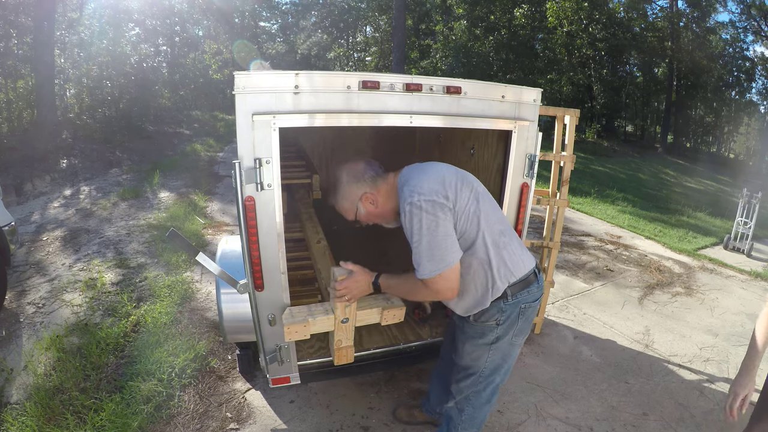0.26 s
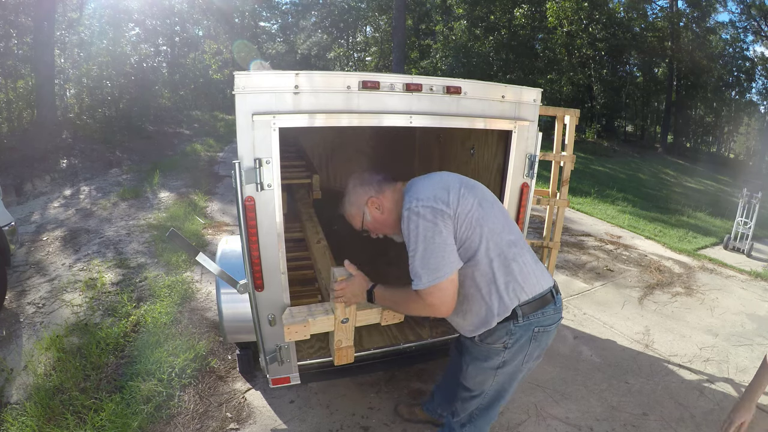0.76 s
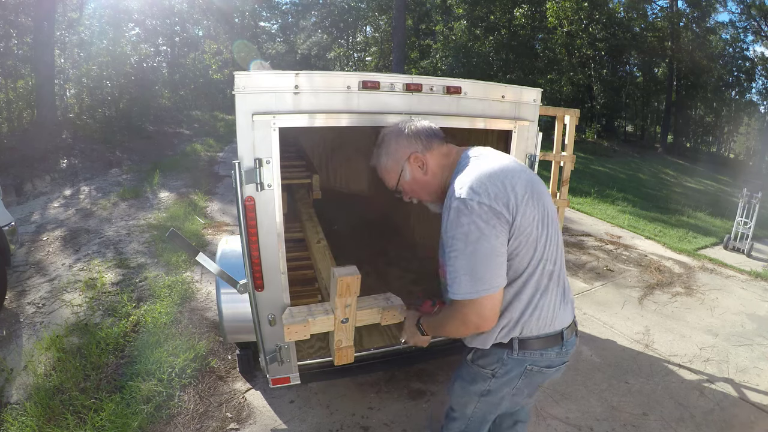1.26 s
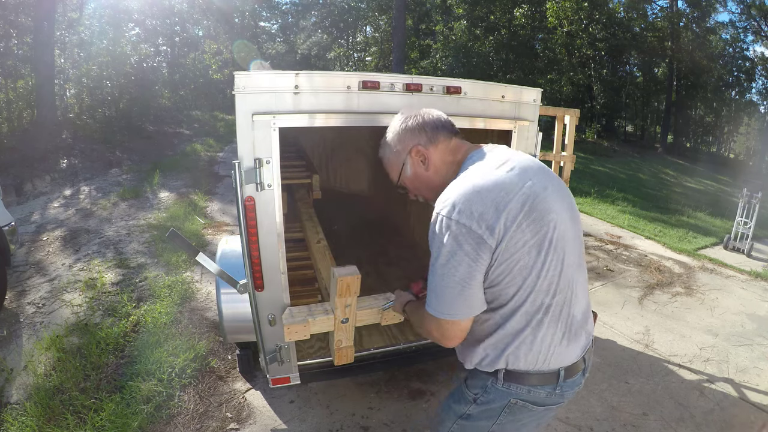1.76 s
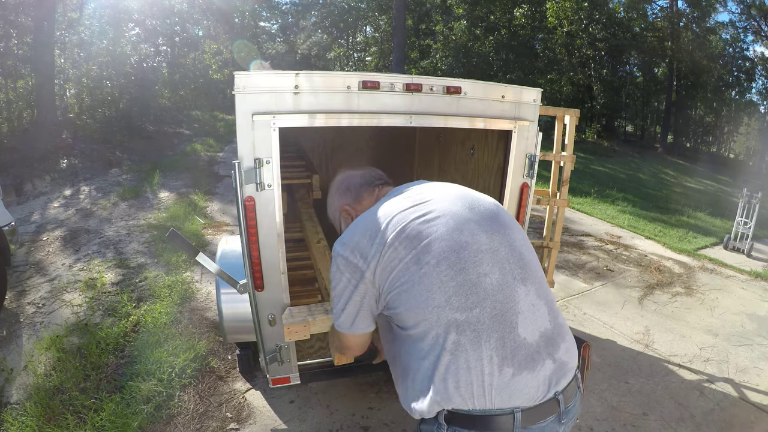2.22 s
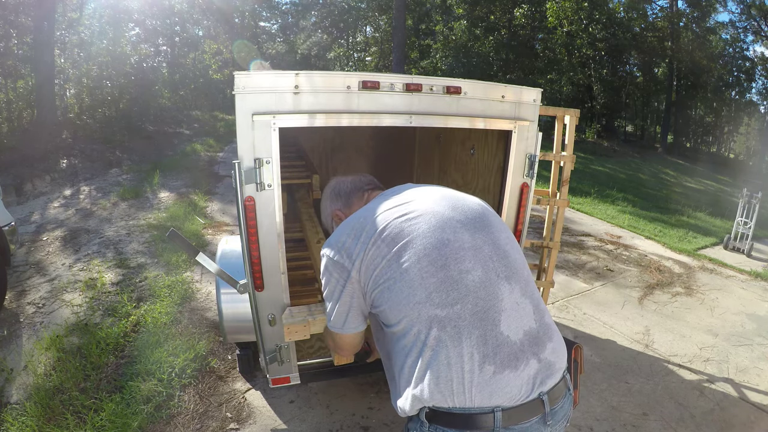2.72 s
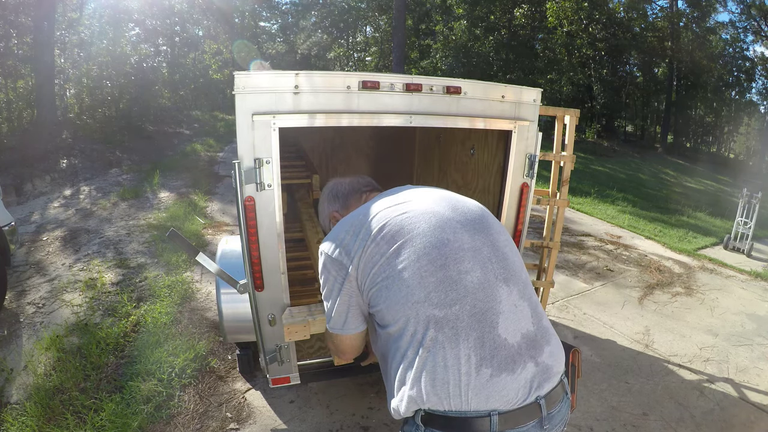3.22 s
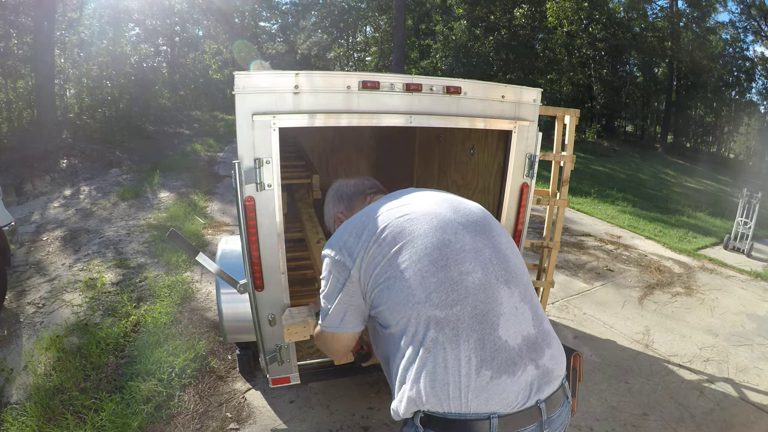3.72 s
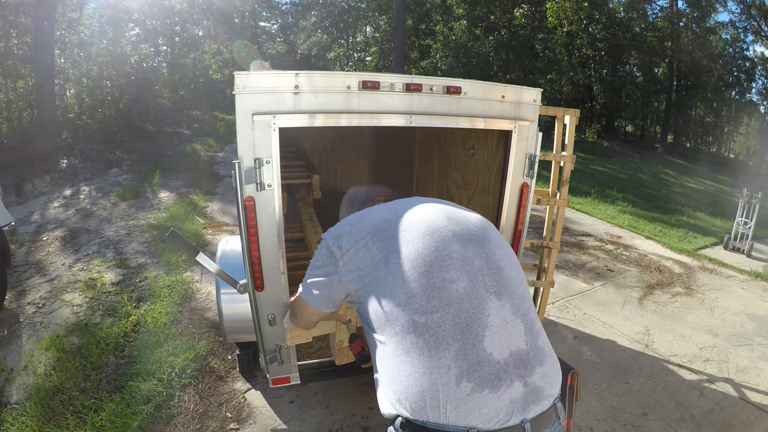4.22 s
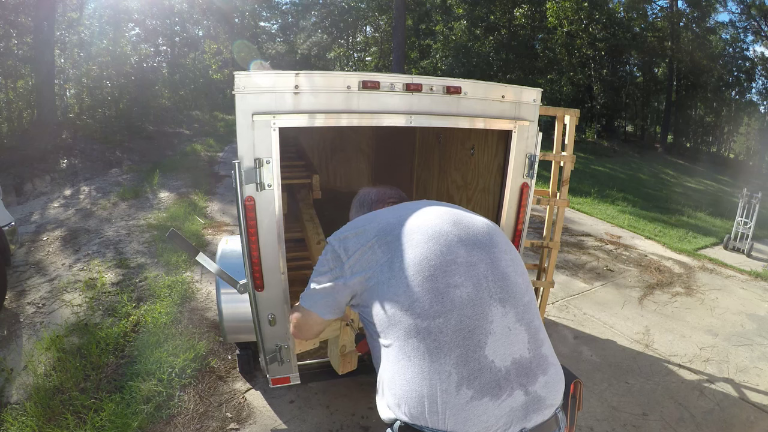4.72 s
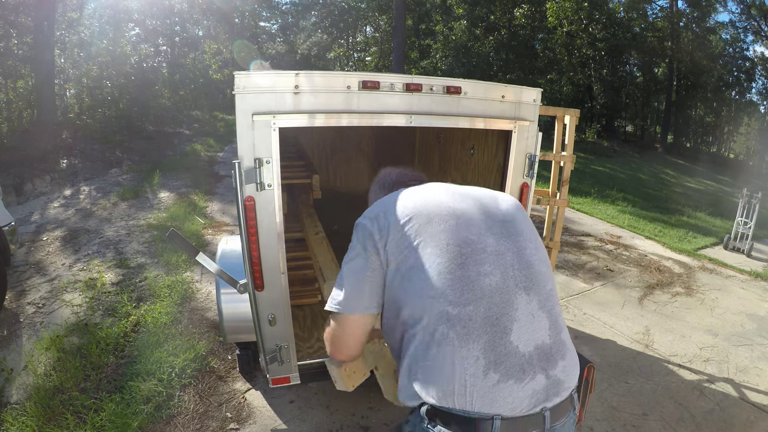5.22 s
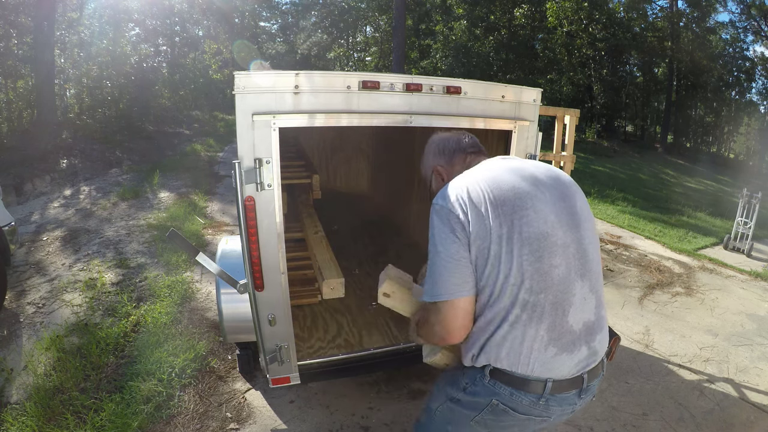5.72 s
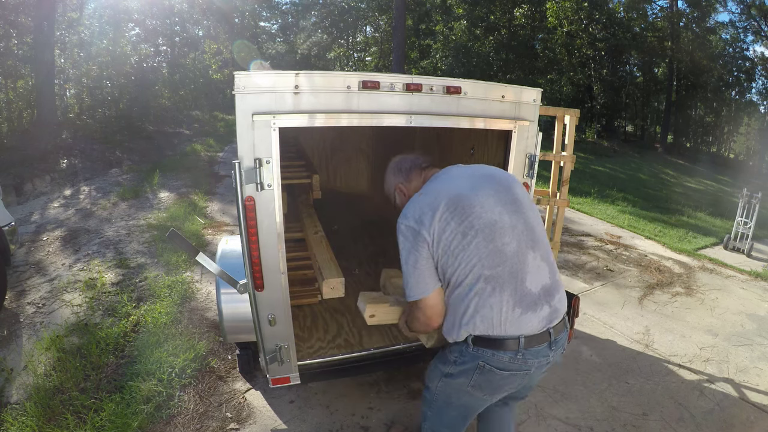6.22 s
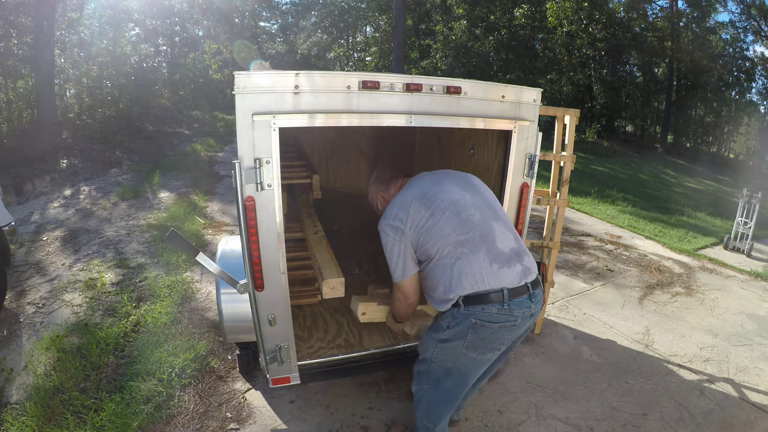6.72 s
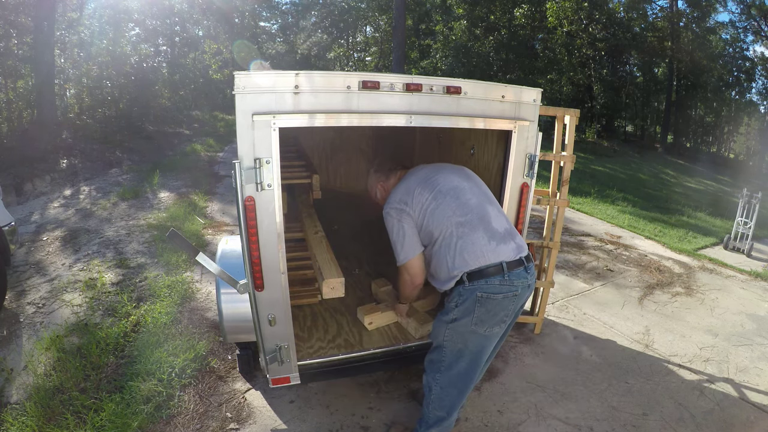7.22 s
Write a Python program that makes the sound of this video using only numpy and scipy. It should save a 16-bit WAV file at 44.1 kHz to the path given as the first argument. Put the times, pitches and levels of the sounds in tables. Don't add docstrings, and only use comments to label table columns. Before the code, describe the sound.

Close outdoor sound at an open box trailer: boards bump the plywood floor and scrape, then a steel clamp is tapped, clinking and ringing. Its screw is wound loose with a thin, broken squeak and small handle taps. A heavy, hollow wooden crash follows, then quieter rubbing, and finally boards land with deep, booming thuds. Insects buzz and light wind rumbles at a small microphone.

```python
import sys
import numpy as np
from scipy import signal
from scipy.fft import rfft, irfft
from scipy.io import wavfile
from scipy.ndimage import uniform_filter1d

SR = 44100
rng = np.random.default_rng(int(sys.argv[2]) if len(sys.argv) > 2 else 0)


def volts(x):
    e = np.asarray(x, float) / 20
    return 10 ** e


def digitize_waveform(pressure):
    field = np.atleast_2d(pressure).T
    bounded = np.clip(field, -1, 1)
    quanta = np.round(bounded * 32767).astype(np.int16)
    wavfile.write(sys.argv[1], SR, quanta)


N = 329427

# (t/s, slip rate f/Hz, squeak level/dB, hand pressure level/dB)
SCREW_TURNS = [(3.435, 480, -43, -47), (3.465, 514, -36.5, -44.5), (3.57, 484, -37.5, -42.5),
               (3.68, 456.5, -38.5, -43.5), (3.72, 518, -44.5, -43.5), (3.84, 497, -40, -44),
               (3.9, 445, -39.5, -46.5), (3.96, 495, -37.5, -46.5), (4.12, 525, -39.5, -46.5),
               (4.17, 473.5, -39, -45.5), (4.25, 518, -38, -46.5), (4.29, 478, -41.5, -47.5),
               (4.36, 520, -44, -48), (4.55, 530, -46, -46.5), (4.59, 472, -44, -45.5),
               (4.66, 521, -43.5, -44.5), (4.86, 507, -42, -43.5), (4.95, 470, -56, -44)]


def evened(x):
    return x / np.sqrt(np.mean(x ** 2) + 1e-20)


def peaked(x, db):
    return volts(db) * x / abs(x).max()


def read(points, hz):
    f, value = np.transpose(points)
    return np.interp(np.log(hz + 1), np.log(f + 1), value)


def curves(rows):
    s, *columns = np.transpose(rows)
    return [np.interp(np.arange(N) / SR, s, c) for c in columns]


def add(mix, s, sound):
    part = mix[round(s * SR):][:len(sound)]
    part += sound[:len(part)]


def colour(x, spectrum):
    gain = volts(read(spectrum, np.fft.rfftfreq(len(x), 1 / SR)))
    return evened(irfft(rfft(x) * gain, len(x)))


def dulled(x, hz):
    return signal.sosfilt(signal.butter(3, hz, fs=SR, output="sos"), x)


def drift(hz):
    keep = 1 / (1 + (np.fft.rfftfreq(N, 1 / SR) / hz) ** 4)
    return evened(irfft(rfft(rng.standard_normal(N)) * keep, N))


def gritty(spread_db, share):
    grains = volts(spread_db * np.minimum(rng.exponential(1, N), 4)) * (rng.random(N) < share)
    return rng.standard_normal(N) * (1 + grains)


def resonate(x, hz, width):
    turn = np.exp(2j * np.pi * np.cumsum(hz * np.ones(len(x))) / SR)
    r = np.exp(-np.pi * width / SR)
    return 2 * (turn * signal.lfilter([1 - r], [1, -r], x / turn)).real


def ring(modes, t, stretch=1):
    wave = sum(volts(db - 60 * t / (t60 * stretch)) * np.sin(2 * np.pi * hz * t) for hz, db, t60 in modes)
    return wave / abs(wave).max()


def tail(t, stretch, spectrum):
    # (f/Hz, t60/s)
    trailer_decay = [(100, 0.41), (300, 0.75), (1000, 0.54), (3000, 0.48), (6000, 0.5), (10000, 0.16)]
    hz, at, z = signal.stft(rng.standard_normal(len(t)), SR, nperseg=256)
    fade_db = 60 * at / (stretch * read(trailer_decay, hz)[:, None])
    z = z * volts(read(spectrum, hz)[:, None] - fade_db)
    wave = signal.istft(z, SR, nperseg=256)[1][:len(t)]
    return wave / np.linalg.norm(wave)


SWELL_DB = 20


def swell(s, rise, fall):
    late = np.arange(N) / SR - s
    return volts(-SWELL_DB * np.maximum(-late / max(rise, .002), late / max(fall, .002)))


def stroke(rows):
    let_go_s = .08
    t = np.arange(N) / SR
    return np.clip((t - rows[0][0]) / 0.0022, 0, 1) * volts(-SWELL_DB * np.maximum(t - rows[-1][0], 0) / let_go_s)


def outdoors():
    # (f/Hz, level/dB per Hz)
    rustle = [(35, -22), (60, -11), (102, -12.5), (222, -8), (785, -19.5), (3660, -29), (4500, -31.5),
              (5800, -18), (7000, -18), (8000, -20.5), (8500, -31), (9800, -30), (12900, -42.5),
              (14500, -54)]
    # (t/s, level/dB)
    gusts = [(0.0, -34), (0.33, -29.5), (0.66, -37), (1.37, -39), (2.23, -53), (2.47, -45), (2.79, -61),
             (3.04, -63), (3.2, -62), (3.95, -36.5), (4.56, -36.5), (4.99, -34), (5.24, -76), (5.45, -25.5),
             (6.62, -39.5), (7.05, -58), (7.28, -59), (7.47, -40)]
    # (f/Hz, level/dB per Hz)
    rumble = [(8.8, -34), (15, 11.5), (27, -4), (43, 0.5), (91, -11.5), (151, -23.5), (200, -38.5),
              (260, -32.5), (440, -120)]
    air = volts(-55 + 1.5 * drift(1.1)) * colour(rng.standard_normal(N), rustle)
    return air + volts(curves(gusts)[0] + 1.7 * drift(24)) * colour(rng.standard_normal(N), rumble)


def insects():
    # (f/Hz, width/Hz, level/dB)
    buzz_bands = [(6800, 200, -10), (7250, 120, -3), (7450, 120, -2), (7620, 120, 0), (7790, 100, -1)]
    level_db, throb_hz = -58, 55.5
    throb = 1 + 0.44 * np.cos(2 * np.pi * np.cumsum(throb_hz * (1 + 0.013 * drift(2.6))) / SR)
    common, out = rng.standard_normal(N), []
    for side_db in (1.5, -1.5):
        noise = 0.85 * common + rng.standard_normal(N)
        buzz = np.zeros(N)
        for hz, width, db in buzz_bands:
            buzz += volts(db) * resonate(resonate(noise, hz, 0.6 * width), hz, 0.6 * width)
        out.append(volts(level_db + side_db + 0.31 * drift(4.2)) * throb * evened(buzz))
    return np.array(out)


def rubbing():
    # (loudest t/s, rise/s, fall/s, hiss level/dB, body against hiss level/dB)
    strokes = [(0.0, .01, 0.19, -52.5, -0.5), (0.142, 0.053, 0.049, -54, -9), (.3, 0.15, 0.13, -54, -15),
               (.56, 0.06, 0.43, -46.5, -8), (0.949, 0.12, 0.033, -35.5, -5.5),
               (1.151, 0.16, 0.053, -66, 16), (1.157, .004, 0.12, -37, -2), (1.202, 0.044, 0.063, -28, -1),
               (1.42, 0.23, 0.21, -54, -1.5), (1.694, 0.016, 0.066, -37, -20),
               (1.851, 0.0056, 0.13, -54, -0.5), (2.275, 0.12, 0.084, -42.5, -4),
               (2.561, 0.32, 0.19, -47, 0.5), (2.914, .003, 0.1, -48.5, -11), (2.05, 0.3, 0.071, -57.5, -8),
               (2.98, 0.003, 0.044, -41.5, -4), (3.005, 0.0073, 0.1, -34.5, 0.5),
               (3.205, .003, 0.05, -50.5, 4), (3.047, 0.003, 0.12, -36.5, -11), (3.154, 0.21, 0.12, -49, 9),
               (3.375, 0.011, 0.16, -32, -12), (3.11, .004, 0.062, -33, -20), (5.18, 0.0027, .16, -37, -9),
               (5.702, 0.0037, 0.043, -47, -8), (5.789, 0.13, 0.038, -49.5, -3),
               (5.983, 0.0041, 0.036, -60, 3), (6.235, 0.046, 0.15, -47, -8.5),
               (6.349, 0.0047, 0.031, -41.5, -15), (6.1, 0.32, 0.82, -64, 1),
               (6.592, 0.013, 0.1, -34.5, -7), (6.861, 0.028, 0.16, -42, 2), (7.09, 0.0044, 0.04, -48, -21),
               (7.248, 0.19, 0.097, -31.5, -4.5)]
    # (f/Hz, level/dB per Hz)
    hiss_spectrum = [(2060, -30), (3500, -15), (4280, -19), (5210, 1.5), (5630, 6), (6270, 3.5),
                     (8340, -14.5), (9680, -14.5), (11200, -35), (14500, -38)]
    # (f/Hz, level/dB per Hz)
    body_spectrum = [(76, -44), (130, 3), (215, 1), (378, -3.5), (439, -4.5), (868, -9), (1720, -7.5),
                     (4500, -14), (5850, -59), (9900, -120)]
    # (f/Hz, level/dB per Hz)
    grumble_spectrum = [(65, -45), (118, -6), (189, 6), (281, -7.5), (328, -11), (365, -24), (600, -29),
                        (780, -46), (1320, -120)]
    # (loudest t/s, rise/s, fall/s, level/dB)
    swish = (7.1, .02, .08, -57)
    # (heaviest t/s, rise/s, fall/s, grumble level/dB, box hum level/dB)
    weight_shifts = [
        (.3, 1, 1.14, -42, -32.5),
        (2.56, 0.31, 0.33, -42, -52),
        (3.15, 0.12, 2.17, -38, -90),
        (4.4, 0.94, 1.4, -56.5, -37.5),
        (5.37, 0.15, 0.37, -33, -26),
        (6.1, .5, 1.1, -77, -55.5),
        (7.05, 0.15, 0.41, -31, -24.5),
        (7.3, 0.35, 0.37, -34, -22),
    ]
    grain = gritty(3.7, .05) * volts(0.76 * drift(49))
    hiss, body = colour(grain, hiss_spectrum), colour(grain, body_spectrum)
    out = np.zeros(N)
    for s, rise, fall, db, body_db in strokes:
        out += swell(s, rise, fall) * volts(db) * (hiss + volts(body_db) * body)

    out += stroke(SCREW_TURNS) * volts(curves(SCREW_TURNS)[2]) * (hiss + volts(-1) * body)
    cloth = colour(grain, [(7000, -14), (12000, 0), (14000, -8), (14800, -54)])
    out += swell(*swish[:3]) * volts(swish[3]) * cloth

    hum = evened(resonate(resonate(rng.standard_normal(N), 69.0, 16.3), 69.0, 16.3))
    grumble = volts(3.2 * drift(6.3)) * colour(rng.standard_normal(N), grumble_spectrum)
    for s, rise, fall, db, hum_db in weight_shifts:
        out += swell(s, rise, fall) * (volts(db) * grumble + volts(hum_db) * hum)
    return out


def boards():
    # (t/s, plywood level/dB, box boom level/dB, crack level/dB, ring stretch factor)
    landings = [(0.153, -17.5, -18.5, -39, 0.99), (0.186, -16, -13.5, -35, 0.99),
                (0.632, -25.5, -50.5, -37, 0.9), (0.65, -16, -30, -62, 0.96),
                (0.759, -28.5, -53, -44, 0.16), (1.721, -38.5, -42, -76, 0.76),
                (1.821, -41.5, -57, -63, 0.76), (4.378, -38, -58, -34, 1), (4.489, -30.5, -28, -33.5, 0.22),
                (4.836, -26, -32, -35.5, 1), (5.176, -6, -8, -7.5, 0.62), (5.192, -7.5, -10, -11, 0.66),
                (5.214, -3, -5.5, -18.5, 0.7), (5.466, -28, -51, -39, 0.88), (6.113, -38, -46, -60, 0.32),
                (6.347, -42.5, -40, -63, 0.24), (6.59, -36, -60, -54, 0.2), (6.838, -12, -14.5, -56, 0.45),
                (6.859, -17, -12.5, -32, 0.64), (6.92, -20, -11.5, -46, 0.92), (6.978, -19, -29, -44, 0.98),
                (7.145, 5.5, -40, -9, 0.69), (7.169, 2.5, -2.5, -28, 0.51), (7.22, 5, -0.5, -20, 0.66)]
    # (f/Hz, level/dB, t60/s)
    box_modes = [(40, -11, 0.41), (59.5, 8, 0.76), (74, 14, 0.44), (93, -28, 1)]
    # (f/Hz, level/dB, t60/s)
    plywood_modes = [(140.9, 1, 0.59), (168, 5, 0.24), (188.9, -8, 0.36), (232.3, -6.5, 0.62),
                     (316, -10.5, 0.2), (349, -9.5, 0.53), (419, 4.5, 0.098), (484, -12, 0.45),
                     (565, -41, 0.71)]
    # (f/Hz, level/dB per Hz)
    crack_spectrum = [(260, -8), (520, -2), (950, -3), (1600, -2), (2500, -10), (3800, -16), (5790, -13),
                      (8630, -60)]
    panel_echo = [(60, -11.0), (150, 7.5), (330, -13.5), (550, -19.0), (1000, -4.5), (3000, -92)]
    rattle_s, crack_s = 0.019, .0003
    out, t = np.zeros(N), np.arange(SR * 3 // 4) / SR
    for s, ply_db, boom_db, crack_db, stretch in landings:
        contact = rng.standard_normal(len(t)) * np.exp(-t / rattle_s) * np.minimum(t / 0.00069, 1)
        contact *= 1 + 2.3 * np.exp(-t / 0.002)
        ply = ring(plywood_modes, t, stretch)
        ply = ply / np.linalg.norm(ply) + volts(2.5) * tail(t, stretch, panel_echo)
        push = np.sin(2 * np.pi * 66 * t) * t * np.exp(-t / 0.0082)
        layers = [(dulled(contact, 387), ply, ply_db + 1.0),
                  (push, ring(box_modes, t, stretch), boom_db + 2.5),
                  (contact * np.exp(-t / crack_s), tail(t, stretch, crack_spectrum), crack_db)]
        for force, body, db in layers:
            add(out, s, peaked(signal.fftconvolve(force, body)[:len(t)], db))
    return signal.sosfilt(signal.butter(2, 42, "high", fs=SR, output="sos"), out)


def knocks():
    # (t/s, peak level/dB, note f/Hz, t60/s, echo level/dB)
    post_hits = [(0.162, -38, 1010, 0.13, 7.5), (.19, -30, 1300, 0.15, -7), (0.298, -44.5, 1250, 0.14, 0),
                 (.632, -34.5, 700, 0.16, 2), (0.661, -39, 710, 0.26, -10), (0.83, -47, 1100, 0.045, -9),
                 (5.178, -25, 1000, 0.15, 13), (5.2, -31, 1500, .1, 0), (5.215, -21, 915, 0.15, 11.5),
                 (5.184, -11.5, 470, 0.42, 2), (5.2, -21.5, 1200, .2, 9), (5.18, -25, 1700, .1, 12.5),
                 (5.178, -38, 3650, 0.061, 6), (5.183, -21.5, 771, 0.18, 9.5), (5.25, -18, 160, 0.3, -6),
                 (5.469, -29, 850, 0.076, 3.5), (0.644, -23, 140, 0.19, -3), (5.19, -31.5, 1100, 0.18, 11),
                 (5.24, -32.5, 1300, .2, 7), (6.845, -14, 140, 0.8, -18), (6.862, -14.5, 195, 0.4, -7),
                 (7.147, -3.5, 380, 0.15, -0.5), (7.229, -37, 1680, 0.16, -6), (7.148, -26, 978, 0.32, 15),
                 (7.158, -28, 2180, 0.085, 8), (7.147, -33, 1500, .12, 5), (7.148, -36, 2900, .1, 8),
                 (7.16, -38, 3500, .1, 8), (7.25, -26.5, 560, .2, 5), (7.175, -16.5, 400, .25, 3),
                 (7.085, -33, 520, 0.14, -2.5), (7.198, -24, 1080, .15, 4), (7.17, -15, 480, 0.22, 7.5),
                 (1.692, -41.5, 3080, .06, 8.5), (5.2, -34, 500, 0.24, -5)]
    # (multiple of the note, level/dB)
    post_partials = [(.63, -5), (1, 5.5), (1.7, -13.5), (2.45, -15)]
    # (t/s, peak level/dB, note f/Hz, t60/s)
    chatter_notes = [(2.53, -43, 1340, 0.22), (2.602, -51, 942, 0.42), (2.598, -47.5, 2445, 0.25),
                     (4.35, -39.5, 905, 0.46), (4.36, -39, 1210, 0.15), (4.414, -33.5, 1194, 0.3),
                     (4.413, -35.5, 918, 0.24), (4.48, -27.5, 1006, 0.082), (4.517, -42, 1066, 0.17),
                     (4.619, -37, 1010, 0.13), (4.667, -44, 1020, 0.11), (4.755, -38, 990, 0.17),
                     (4.8, -39, 1040, 0.17), (4.86, -39, 1025, .12), (4.886, -53, 1024, .1),
                     (4.909, -52, 990, .1), (4.932, -34.5, 987, 0.16), (4.971, -42.5, 1047, 0.22)]
    out, t = np.zeros(N), np.arange(SR // 3) / SR
    onset = np.minimum(t / 0.0014, 1)
    for s, db, hz, t60, echo_db in post_hits:
        modes = [(k * hz, rel_db, t60 / np.sqrt(k)) for k, rel_db in post_partials]
        note = ring(modes, t) * onset
        burst = note * np.exp(-t / 0.0015)
        room = tail(t, 0.5, [(300, 0.011), (5000, 0.0053)])
        echo = signal.fftconvolve(burst / np.linalg.norm(burst), room)[:len(t)]
        add(out, s, volts(db) * (note + volts(echo_db) * np.linalg.norm(note) * echo))
    for s, db, hz, t60 in chatter_notes:
        add(out, s, volts(db) * ring([(hz, 0, t60), (1.1 * hz, -7, t60)], t) * onset)
    return out


def ticks():
    # (t/s, peak level/dB, lower body against it level/dB)
    grit_ticks = [(0.5494, -32, -35), (0.915, -39, -9), (1.1515, -35, 9), (1.6004, -31, 19),
                  (1.6757, -19.5, -18), (1.7734, -33.5, -26), (1.8466, -44, -8), (5.1766, -13, 13),
                  (5.548, -44.5, -12), (5.7012, -38, -28), (6.1377, -39, -27), (6.345, -43, -23),
                  (6.5992, -23.5, 7), (6.8538, -45, 4), (7.088, -34, -19), (7.1436, -18, 33),
                  (7.1561, -12, -3), (0.359, -40, -8), (5.5, -53, -20)]
    # (t/s, peak level/dB, lower body against it level/dB)
    jaw_clicks = [(2.388, -17, -6.5), (2.5207, -32.5, -21), (2.5498, -25.5, -40), (2.9126, -37.5, 16),
                  (2.9761, -21.5, -41), (3.0439, -19, -43), (3.1098, -28, -35), (3.152, -40, -26),
                  (3.2027, -26, -24), (3.3743, -18, -43), (3.4027, -22, -8), (4.5693, -35, -8),
                  (4.6045, -30, 4), (4.9297, -51, -17)]
    snap_db, echo_db = 5, 1
    out, t = np.zeros(N), np.arange(SR // 4) / SR
    for rows, body_hz, body_t60, low_db in ((grit_ticks, 3320, .001, -11), (jaw_clicks, 2560, .02, -24)):
        for s, db, body_db in rows:
            bright = [(6000, 7, 0.004), (4700, 5, 0.004), (9200, -18, 0.0027)]
            lower = [(body_hz, body_db, body_t60), (1760, body_db + low_db, 0.0014)]
            click = ring(bright + lower, t)
            room = tail(t, .36, [(700, -25), (2000, 0), (11000, 0)])
            echo = signal.fftconvolve(click[:300], room)[:len(t)]
            add(out, s, volts(db + snap_db) * (click + volts(echo_db) * echo))
    return out


def clamp():
    # (t/s, bar level/dB, low thud level/dB, bright chink level/dB)
    taps = [(2.385, -22, -19, -25), (2.513, -35, -28, -38), (2.553, -36, -61, -26.5),
            (2.911, -71, -77, -35.5), (2.979, -27.5, -58, -22), (3.004, -54, -23, -41),
            (3.047, -36, -30, -37), (3.104, -29.5, -16.5, -28), (3.156, -45, -18, -41),
            (3.206, -48, -24, -52), (3.243, -69, -30, -60), (2.42, -47, -22.5, -45), (3.358, -40, -26, -33),
            (3.373, -33.5, -29, -20), (4.376, -53, -55, -37), (4.484, -43, -59, -48)]
    # (f/Hz, level/dB, t60/s)
    bar_modes = [(925, 0, .28), (960, -2, .2), (1020, -7, .1), (1300, -7, .12), (1450, -7, .14),
                 (1760, -10, .1), (2490, -4, .4), (2600, -9, .1), (3400, -8, .12), (3640, -9, .12)]
    # (f/Hz, level/dB, t60/s)
    thud_modes = [(185.4, 12.5, 0.28), (232.3, 11, 0.29), (147.6, -3, 0.25), (291, 3, 0.13)]
    # (f/Hz, level/dB, t60/s)
    chink_modes = [(4760, -3, .07), (5360, 0, .06), (5000, -2, .09), (6180, -2, .09), (5770, 0, .07),
                   (6600, -6, .1)]
    # (f/Hz, level/dB, t60/s)
    buckle_modes = [(1560, 2, .5), (4380, 2, .4)]
    out, t = np.zeros(N), np.arange(SR // 2) / SR
    for s, db, thud_db, chink_db in taps:
        shake = (1 + .5 * rng.standard_normal(len(t))) * np.exp(-t / 0.00006)
        loose = volts(2.4 * evened(uniform_filter1d(rng.standard_normal(len(t)), size=400)))
        parts = [(bar_modes, db), (thud_modes, thud_db - 4.0), (chink_modes, chink_db + 0.5)]
        for modes, level_db in parts:
            onset = np.minimum(t * modes[0][0] / 2, 1)
            struck = signal.fftconvolve(shake, ring(modes, t))[:len(t)]
            add(out, s, peaked(loose * onset * struck, level_db))
    add(out, 7.088, volts(-41.5) * ring(buckle_modes, t))
    return out


def screw():
    # (multiple of the slip rate, level against the fifth/dB)
    weak_partials = [(3, -15), (6, -12), (7, -14), (8, -15), (9, -12)]
    # (f/Hz, level/dB)
    strands = [(1820, -16), (2260, -14), (2770, -11), (3200, -17), (3900, -19), (4600, -18), (5300, -13)]
    loose_s, loosen_s, tight_most_db = 4.62, .05, -16
    slip_hz, fifth_db, _ = curves(SCREW_TURNS)
    tight = np.clip((loose_s - np.arange(N) / SR) / loosen_s, 0, 1)
    tight_db = tight_most_db * tight
    turns = np.cumsum(slip_hz * (1 + .004 * drift(60) + .002 * drift(8))) / SR
    partials = [(5, fifth_db), (2, -51 + tight_db), (4, -51.5 + tight_db)]
    partials += [(k, fifth_db + db) for k, db in weak_partials]
    stack = sum(volts(db + 2.5 * drift(18)) * np.cos(2 * np.pi * k * turns) for k, db in partials)

    grip = .45 * tight
    stack = stack * (1 - grip + grip * drift(45)) * volts(-7 * grip * np.clip(drift(14), 0, 3))

    bar = sum(volts(db) * resonate(rng.standard_normal(N), hz, 30) for hz, db in ((2510, 0), (2790, -3)))
    stray = np.zeros(N)
    for hz, db in strands:
        phase = 2 * np.pi * np.cumsum(hz * (1 + .012 * drift(7) + .008 * drift(60))) / SR
        stray += np.cos(phase) * volts(db + 3.5 * drift(16))
    singing = volts(-11) * evened(bar) + stray

    squeak = (stack + volts(fifth_db - 5 + 3 * drift(6)) * singing) * stroke(SCREW_TURNS) ** 2
    echo = tail(np.arange(SR // 2) / SR, .5, [(1000, 0), (5000, 0)])
    return squeak + volts(-10) * signal.fftconvolve(squeak, echo)[:N]


def ports(x, unrest):
    # (f/Hz, left minus right level/dB)
    port_tilt = [(200, -.4), (500, .3), (1100, -1.5), (2600, -1.5), (4000, -6), (5000, -15), (6100, -19),
                 (7200, -10), (8200, -1.5), (11000, -.5)]
    # (f/Hz, coherence 0..1)
    likeness = [(60, .994), (200, .97), (400, .86), (600, .4), (800, .72), (2000, .65), (4500, .6),
                (5500, .3), (8000, .15), (10500, .2), (13000, .6)]
    # (f/Hz, left lead/rad)
    left_lead = [(60, 0), (250, -.2), (520, -.55), (790, 2.0), (1600, 1.5), (2500, 1.05), (4500, .6),
                 (6200, 1.05), (7000, 3.6), (8300, 4.6), (10400, 4.6), (11000, 6.28)]
    hz, at, z = signal.stft(x, SR, nperseg=1024, noverlap=768)
    same = np.clip(read(likeness, hz), .05, 1)[:, None]
    turn = np.exp(1j * read(left_lead, hz))[:, None]
    tilt = volts(read(port_tilt, hz))[:, None]
    shake = uniform_filter1d(rng.standard_normal(z.T.shape), size=5, axis=0)
    shake = evened(uniform_filter1d(shake, size=7, axis=1)).T
    left = tilt * turn * np.exp(1j * np.sqrt(-2 * np.log(same)) * unrest * shake)
    middle = np.sqrt(tilt ** 2 + 1 + 2 * tilt * same * turn.real) / 2
    middle = np.maximum(abs(1 + left) / 2, .7 * middle)
    return signal.istft(np.array([left * z, z]) / middle, SR, nperseg=1024, noverlap=768)[1][:, :N]


def scene():
    lasting = outdoors() + rubbing() + screw()
    blows = dulled(dulled(boards() + ticks() + clamp(), 9200), 9200)
    return ports(blows + knocks(), .7) + ports(lasting, 1) + insects()


def low_pass(x):
    return signal.sosfilt(signal.butter(12, 14720, fs=SR, output="sos"), x)


def record(dry):
    dry = signal.sosfilt(signal.butter(1, 24, "high", fs=SR, output="sos"), dry)
    power_db = 10 * np.log10(abs(uniform_filter1d((dry ** 2).mean(0), 700)) + 1e-12)
    fall = np.arange(N) * 60. / SR
    held_db = np.maximum.accumulate(power_db + fall) - fall
    over_db = np.maximum(held_db + 17.5, 0)
    held = dry / volts(0.75 * uniform_filter1d(over_db, 150))
    ceiling = .52
    return low_pass(ceiling * np.tanh(held / ceiling))


dry = scene()
out = record(dry)
digitize_waveform(out)
```